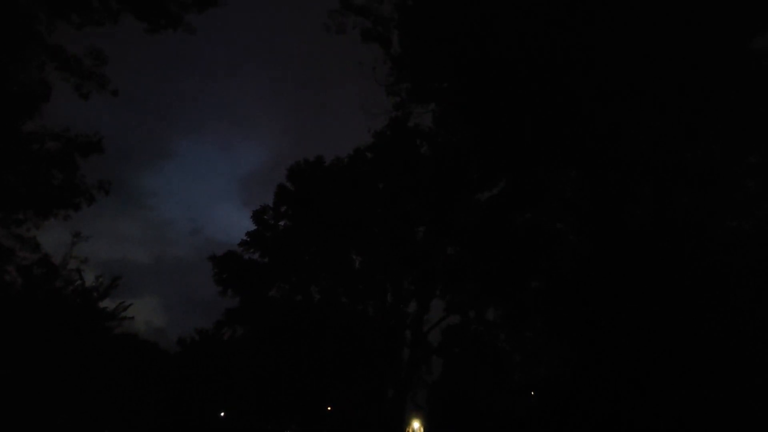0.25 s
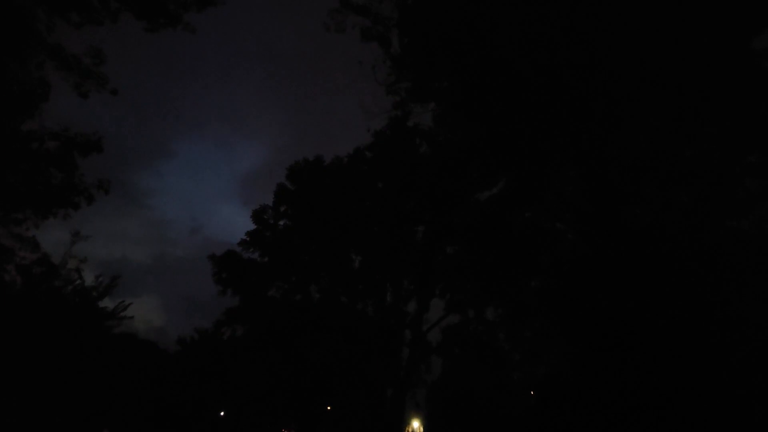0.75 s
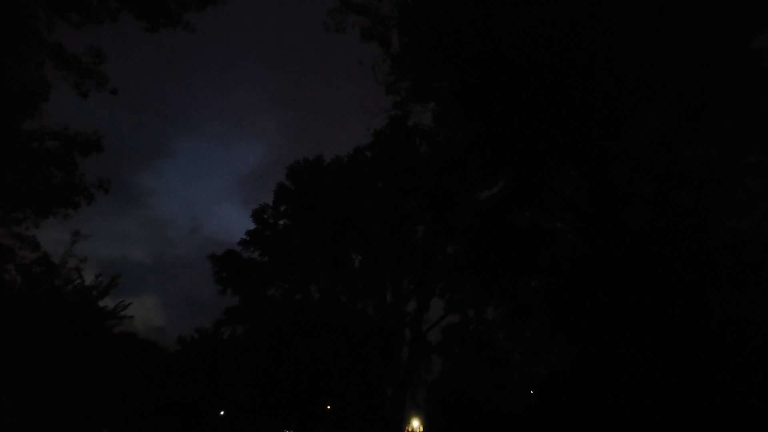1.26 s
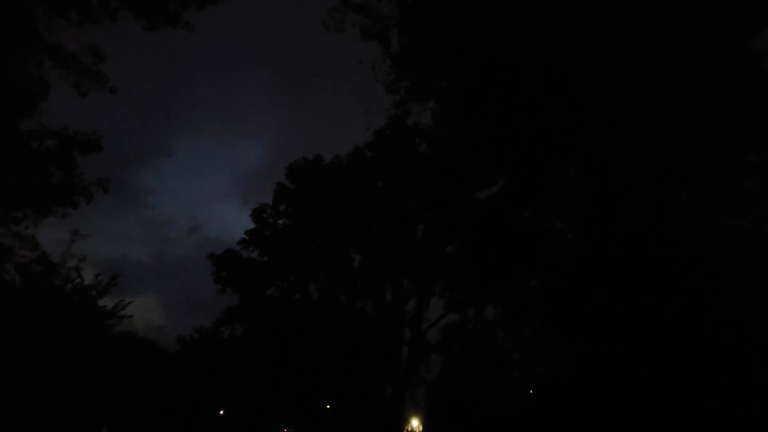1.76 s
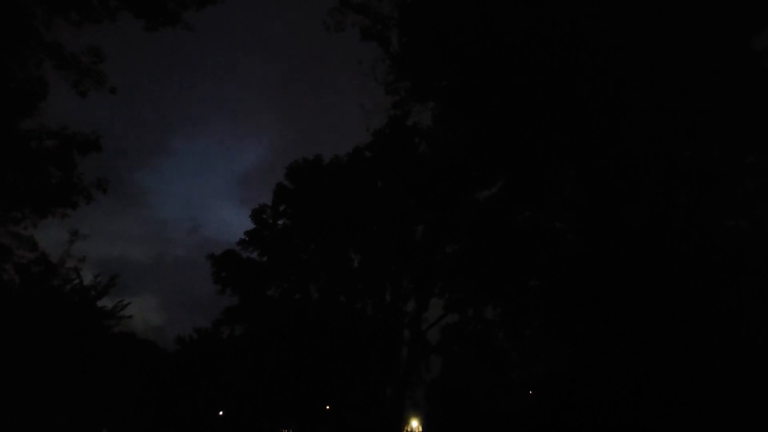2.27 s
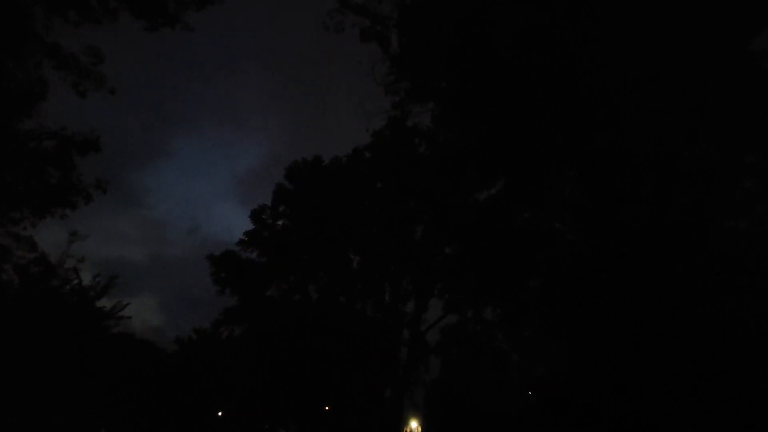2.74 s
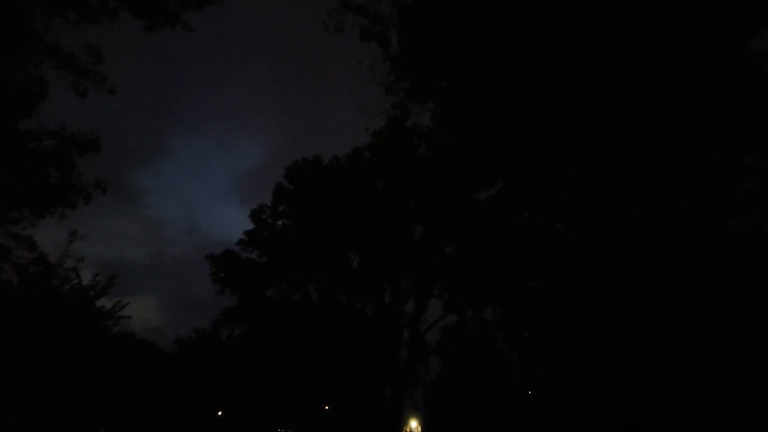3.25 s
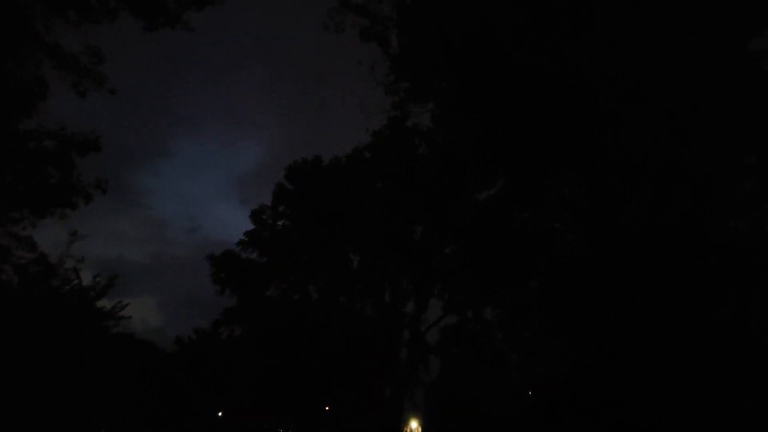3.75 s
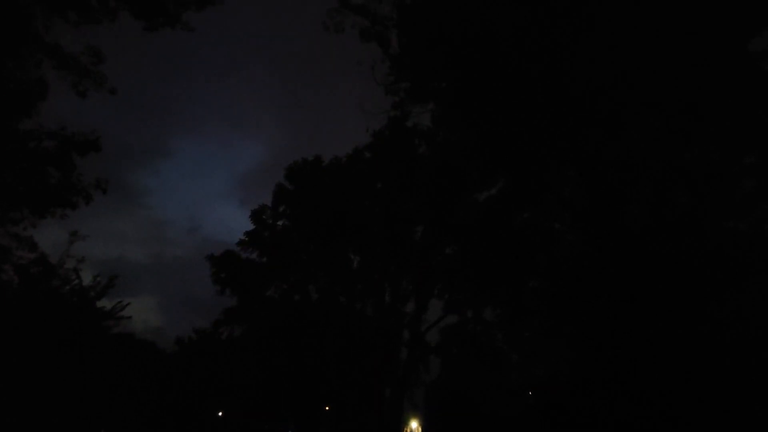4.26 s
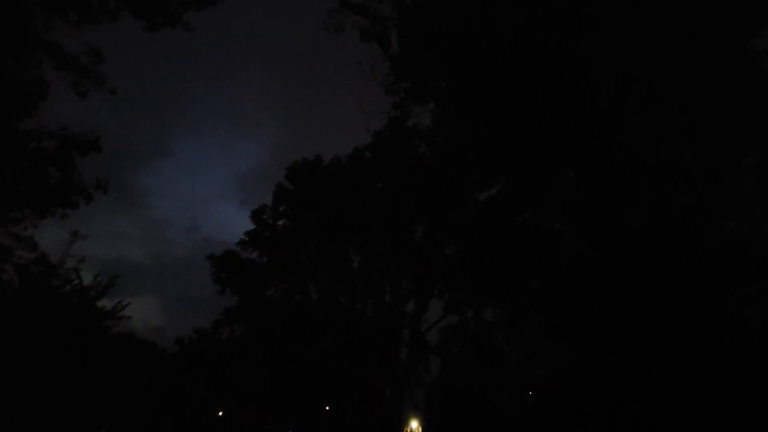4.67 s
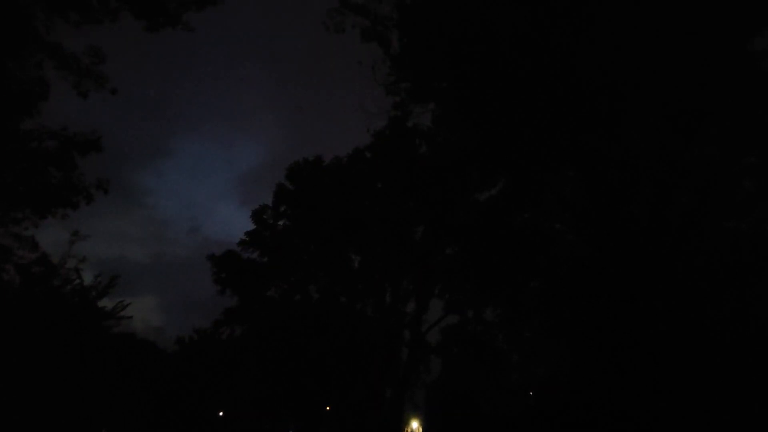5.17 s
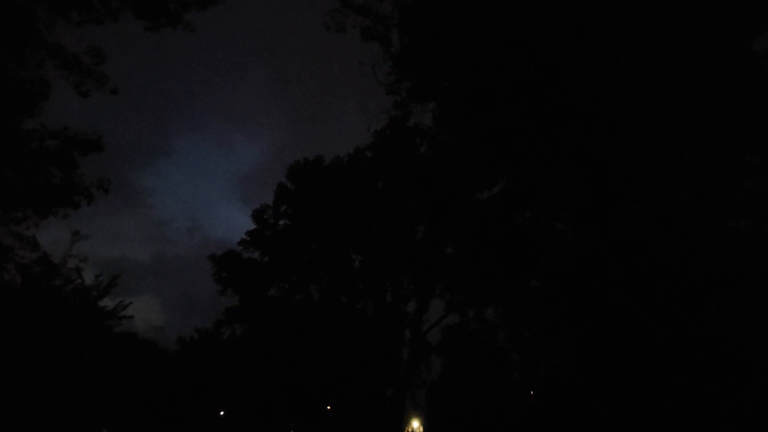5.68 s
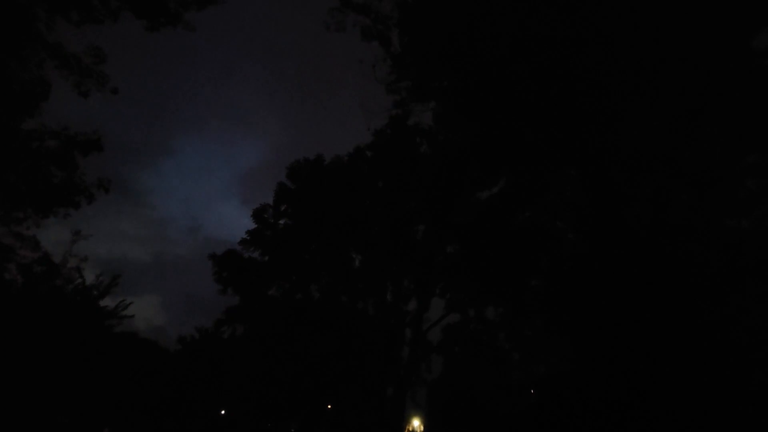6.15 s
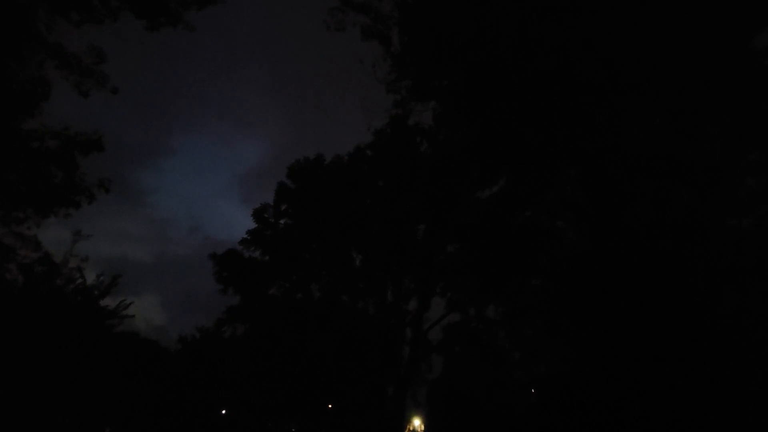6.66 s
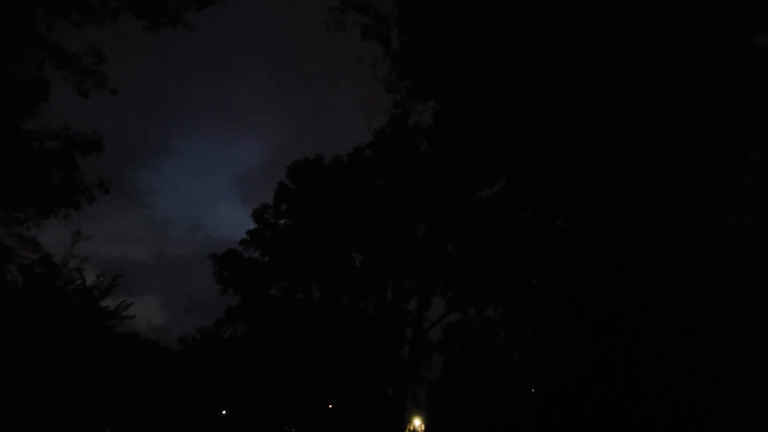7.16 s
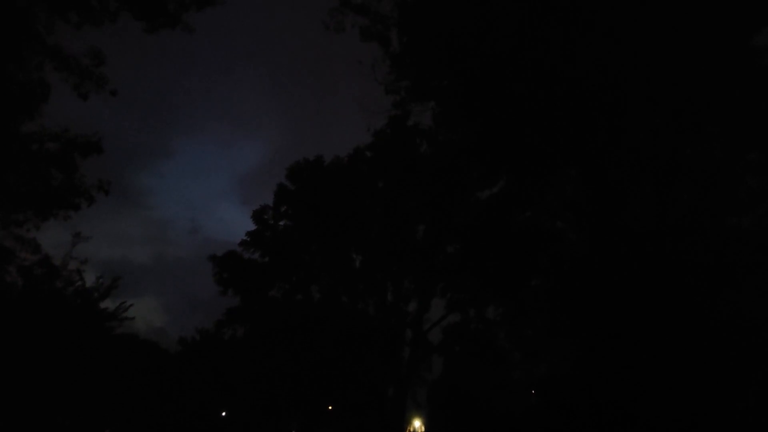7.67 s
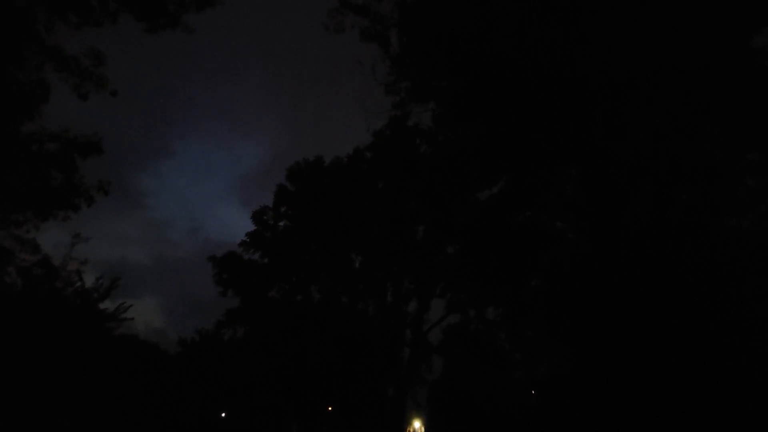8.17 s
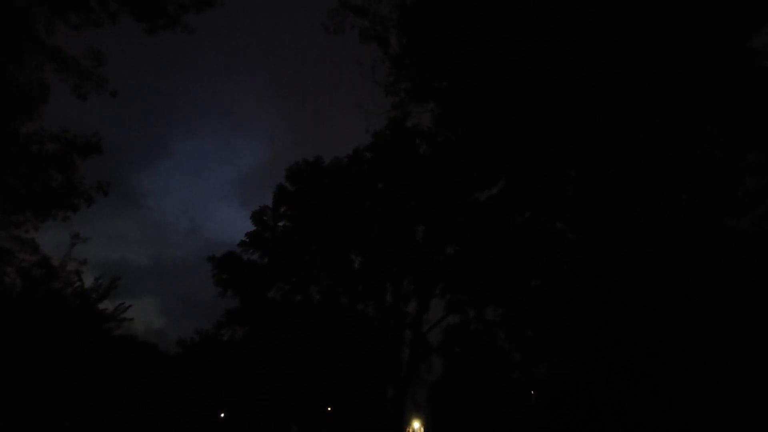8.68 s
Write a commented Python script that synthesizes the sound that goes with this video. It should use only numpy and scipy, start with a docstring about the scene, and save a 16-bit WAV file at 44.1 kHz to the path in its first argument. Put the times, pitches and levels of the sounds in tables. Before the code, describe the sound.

A warm night among trees, heard in wide stereo for about nine seconds. A close cricket trills fast near 3 kHz, breaking off briefly around 3.0, while a scattered tree chorus slowly grows behind it. Higher crickets sing up around 2.5-3, 3.3-5.7 and 6.5-7.6; others shimmer near 7 kHz. A very high fluttering hiss weakens after 1.7. Tiny lisps tick along five times a second, a second set joining at 6.5, with thin buzzes near 4.4 and 5.7. Katydids rasp coarsely, faint at 0.3, then mostly in pairs roughly every 0.65 seconds, sparser before 2.6. A distant engine hums around 100 Hz, rising slightly, then drops about 3.2 and fades unevenly into soft rumble. Distant thunder swells from 7.1 and is gone before 8; a small dry close tick falls at 7.8. Soft air gradually settles throughout.

```python
"""Summer night among trees

Crickets trill as runs of short falling tones; katydids rasp as noise chopped by the teeth of a wing.
Smaller insects lisp, buzz and hiss higher up, all made from narrow bands of noise.
Far off an engine, a few sine tones, drones, eases and fades into a low rumble of dull noise.
A soft wash of air lies around it all; late on, distant thunder swells once and a small dry tick rings."""
import sys
import numpy as np
from scipy import signal
from scipy.fft import rfft, irfft, next_fast_len
from scipy.io import wavfile

SR = 44100
rng = np.random.default_rng(int(sys.argv[2]) if len(sys.argv) > 2 else 0)


def waveform_to_disk(signal):
    """Save audio, clipped to [-1, 1], as 16-bit WAV at the path in sys.argv[1]."""
    frames = np.transpose(np.atleast_2d(signal))
    scaled = np.clip(frames, -1, 1) * 32767
    samples = np.round(scaled).astype(np.int16)
    wavfile.write(sys.argv[1], SR, samples)


N = 393372
TIME = np.arange(N) / SR
SIZE = next_fast_len(N, True)
HZ = np.fft.rfftfreq(SIZE, 1 / SR)


def gain_of(db):
    """Turns decibels into amplitude."""
    return 10 ** (np.asarray(db) / 20)


def evened(x):
    """Scales a sound to an rms (average strength) of 1."""
    return x / np.sqrt(np.mean(x ** 2) + 1e-20)


def read(points):
    """Reads a table over frequency, joining its points on a log axis."""
    hz, value = np.transpose(points)
    return np.interp(np.log(HZ + 1), np.log(hz + 1), value)


def follow(rows):
    """Makes a curve over time by joining points with straight lines."""
    return np.interp(TIME, *np.transpose(rows))


def bell(s, half_width_s):
    """Makes a soft swell of height 1 around a moment."""
    return np.exp(-.5 * ((TIME - s) / half_width_s) ** 2)


def drift(per_s):
    """Wanders at random with rms 1: a sum of slow sines, the fastest at per_s cycles per second."""
    t = np.linspace(0, N / SR, 900)
    rates = per_s * np.geomspace(1 / 20, 1, 20)[:, None]
    waves = np.sin(2 * np.pi * (rates * t + rng.random((20, 1))))
    return np.interp(TIME, t, evened((waves / rates ** (1 / 4)).sum(0)))


# How alike the noise is at the left and right ports.
# Each row: frequency in Hz, likeness from -1 (opposite) through 0 (unrelated) to 1 (the same).
PORT_LIKENESS = [(60, .98), (150, 1), (230, 0.99), (330, 0.53), (500, -0.25), (1170, -0.39), (1800, -0.31),
                 (2700, -0.024)]


def noise(colour_db):
    """Makes noise from all around: the two ports agree in the bass and differ higher up."""
    a, b = rng.standard_normal((2, len(HZ))) + 1j * rng.standard_normal((2, len(HZ)))
    same = np.clip(read(PORT_LIKENESS), -1, 1)
    ports = np.array([a, same * a + np.sqrt(1 - same ** 2) * b])
    return evened(irfft(ports * gain_of(colour_db), SIZE)[:, :N])


def wing(hz, width_hz):
    """Gives the gain in dB of a wing that rings at one pitch and falls off steeply on both sides."""
    return -20 * np.log10(1 + ((HZ - hz) / (width_hz / 2)) ** 2 / 2)


def trees(x, t60=0.5):
    """Scatters a sound off trunks and leaves, differently to each port; it dies 60 dB in t60 seconds."""
    t = TIME[:SR // 2]
    tail = rng.standard_normal((2, len(t))) * gain_of(-60 * t / t60)
    return evened(irfft(rfft(x, SIZE) * rfft(tail, SIZE), SIZE)[:, :N])


def from_right(x, count=15):
    """Places a sound to the right: the left port hears it a few samples late."""
    left, right = x * np.ones((2, 1))
    return np.array([np.pad(left, (count, 0))[:N], right])


def trill(rows, lean_db, haste=0.0038, flutter_db=0.5, duty=0.73):
    """Sings each wing stroke as a short tone falling in pitch; every cricket keeps its own tempo."""
    out = np.zeros((2, N))
    for hz, rate, fall_hz, db, scattered, wander_hz in rows:
        strokes = np.cumsum(rate * (1 + haste * drift(2))) / SR + rng.random()
        # the wing sounds for the share "duty" of each stroke, then rests
        closing = np.minimum(strokes % 1 / duty, 1)
        pitch = hz + wander_hz * drift(7) + fall_hz * (closing.mean() - closing)
        tone = np.sin(2 * np.pi * np.cumsum(pitch) / SR)
        song = evened(np.sin(np.pi * closing) * tone) * gain_of(flutter_db * drift(10))
        # a positive lean makes the left port louder
        direct = from_right(song, count=12) * gain_of([[lean_db], [-lean_db]])
        scattered = np.clip(scattered, 0, 1)
        out += gain_of(db) * (np.sqrt(1 - scattered) * direct + np.sqrt(scattered) * trees(song))
    return out


# Four groups of trilling crickets: one close by, then the tree, field and ground choruses.
# Each row: wing tone in Hz, wing strokes per second, fall of the tone in a stroke in Hz,
# level in dB before the group's own level, share scattered by the trees 0-1, wander of the tone in Hz.
CLOSE_CRICKET = [(3062, 69.5, 120, -50.3, .05, 4)]
TREE_CHORUS = [(2960, 70, 210, -55.5, 0.74, 24), (3097, 69, 173, -56.5, 0.95, 28),
               (3034, 73, 256, -55, 0.93, 36), (2992, 63, 350, -57.5, 0.95, 45),
               (3566, 52, 190, -71.5, 0.89, 10.04)]
FIELD_CHORUS = [(5030, 64, 490, -70.5, 0.66, 50), (4916, 30, 560, -70, .95, 80)]
GROUND_CHORUS = [(7010, 40.5, 230, -66, 0.85, 29), (6920, 30, 254, -66, 0.83, 45),
                 (7086, 80, 475, -66.5, 0.96, 70), (6660, 47, 450, -71, 0.9, 55)]
# How keenly the close cricket sings; it breaks off once. Each row: time in seconds, level in dB.
CLOSE_KEENNESS = [(0, -3.5), (2.9, -3), (3.05, -20), (3.4, -3), (5.6, -5), (6.1, -0.5), (6.7, -6.5),
                  (7.5, 0.5), (8.9, -4)]
# Bouts in which the field crickets sing up. Each row: start in seconds, end in seconds, level in dB.
SINGING_BOUTS = [(2.5, 3.0, 2), (3.3, 5.7, 2), (6.5, 7.6, 4)]


def crickets(rest_db=-1.5, bout_edge_s=0.16, throb_per_s=4.1, throb_db=1.13):
    """Trills one cricket close by and three looser choruses; two slowly grow, one sings in bouts."""
    near = trill(CLOSE_CRICKET, lean_db=2.8, duty=.66) * gain_of(follow(CLOSE_KEENNESS))
    tree_db = -2.5 + 0.5751 * TIME + 0.03 * drift(3)
    tree = trill(TREE_CHORUS, lean_db=0.0, haste=.02) * gain_of(tree_db)
    field_db = rest_db + 0.5 * drift(4)
    for start, end, db in SINGING_BOUTS:
        inside_s = np.minimum(TIME - start, end - TIME)
        field_db += (db - rest_db) * np.clip(inside_s / bout_edge_s + .5, 0, 1)
    field = trill(FIELD_CHORUS, lean_db=-2.0, haste=.035, duty=0.78) * gain_of(field_db)
    # the ground chorus, the highest, throbs in level
    throb = throb_db * np.sin(2 * np.pi * (throb_per_s * TIME + 0.14 * drift(1.55)))
    ground = trill(GROUND_CHORUS, lean_db=4.0, haste=.025) * gain_of(-2 + 0.32 * TIME + throb)
    return near + tree + field + ground


# Colour of the coneheads' high hiss. Each row: frequency in Hz, level in dB.
HISS_COLOUR = [(8500, -20), (10500, -17), (11500, 2.5), (12400, 8), (13400, 6), (14050, 10), (14600, 8.5),
               (15700, -2.5)]
# Strength of the hiss; one conehead stops early on.
# Each row: time in seconds, level in dB before the overall lift.
HISS_STRENGTH = [(0, -63.5), (1.69, -63), (1.84, -66), (2.7, -65.7), (3.2, -67.5), (5.5, -69), (7.7, -68),
                 (7.85, -65.5), (8.92, -70)]


def coneheads(lift_db=2.5, flutter_db=1.0, sway_db=1.0):
    """Hisses without a break at the top of hearing: high noise that flutters slightly."""
    level_db = lift_db + follow(HISS_STRENGTH) + flutter_db * drift(90) + sway_db * drift(3)
    return gain_of(level_db) * noise(read(HISS_COLOUR))


# The far engine pulls, then eases off. Each row: time in seconds, firing rate in Hz.
FIRING_RATE = [(0, 95), (.5, 97.3), (1.7, 102), (2.6, 103.5), (3.15, 103), (3.45, 82), (4.5, 80.5), (7, 66)]
# Strength of its firing tone. Each row: time in seconds, level in dB.
FIRING_STRENGTH = [(0, -37), (.5, -35.5), (1.08, -40), (1.25, -32.5), (1.5, -37), (1.95, -38.5),
                   (3.8, -51.5), (4.6, -47), (7.1, -54.5)]
# The firing tone drops out briefly on the long way.
# Each row: time in seconds, half-width in seconds, change in dB.
FIRING_DROPOUTS = [(.32, 0.042, -16), (.6, .028, -9), (.85, 0.032, -11.5), (2.15, 0.084, -14.5)]
# Tones above the firing tone, the last perhaps from another machine; all sink with time.
# Each row: multiple of the firing rate, level at first in dB, change in dB per second.
UPPER_TONES = [(1.5, -64.5, -0.5), (2, -57, -1.77), (2.5, -62.5, -1.23), (3.16, -61.5, -4)]
# An upper tone swells now and then.
# Each row: which upper tone counted from 0, time in seconds, half-width in seconds, swell in dB.
UPPER_SWELLS = [(1, 1.05, .13, 4.5), (2, 1.37, .3, 6), (1, 1.76, 0.13, 8), (1, 2.64, .11, 12.5),
                (1, 3.1, 0.1, 10)]


def engine(fading_db=1.6, lumpy_turns=0.18, lumpy_db=3.5):
    """Hums a firing tone and a few tones above it; off the throttle the engine runs unevenly."""
    coasting = follow([(3.0, 0.058), (3.4, 1)])
    turns = np.cumsum(follow(FIRING_RATE)) / SR + coasting * lumpy_turns * drift(11)
    dropouts = sum(db * bell(s, half_width_s) for s, half_width_s, db in FIRING_DROPOUTS)
    firing_db = follow(FIRING_STRENGTH) + dropouts + coasting * lumpy_db * drift(13)
    drone = gain_of(firing_db) * np.sin(2 * np.pi * turns)
    for k, (multiple, first_db, db_per_s) in enumerate(UPPER_TONES):
        tone_db = first_db + db_per_s * TIME + fading_db * drift(7.2)
        for which, s, half_width_s, db in UPPER_SWELLS:
            if round(which) == k:
                tone_db += db * bell(s, half_width_s)
        drone += gain_of(tone_db) * np.sin(2 * np.pi * (multiple * turns + rng.random()))
    return np.sqrt(2) * drone  # lifts a sine to rms 1


# Colour of the far rumble. Each row: frequency in Hz, level in dB.
RUMBLE_COLOUR = [(15, -35), (25, -18), (38, -11.5), (52, -1), (68, -2.5), (90, -4.5), (120, -8.5),
                 (160, -18), (235, -15.5), (280, -21), (340, -22.5), (420, -44.5), (600, -52.5)]
# How the rumble swells. Each row: time in seconds, level in dB.
RUMBLE_STRENGTH = [(0, -51), (1.8, -46.5), (4.6, -45.5), (6.9, -51), (7.8, -47), (8.92, -47.5)]


def rumble(roll_db=1.06):
    """Rumbles dully: low noise whose level rolls at random."""
    return gain_of(follow(RUMBLE_STRENGTH) + roll_db * drift(10)) * noise(read(RUMBLE_COLOUR))


# Colour of the night air and the blur of far insects. Each row: frequency in Hz, level in dB.
AIR_COLOUR = [(150, 3), (400, -4), (750, 0.5), (1000, -5), (1300, -4.5), (1800, -9.5), (2400, -11.5),
              (3050, 1.5), (3500, -8), (4200, -14), (4900, -13.5), (5600, -21), (6400, -13.5), (7350, -10),
              (7650, -33.5), (10000, -30.5), (11500, -32)]


def air(start_db=-49.5, settle_db_per_s=0.4833, stir_db=1.03):
    """Washes softly from all around: noise that slowly settles."""
    return gain_of(start_db - settle_db_per_s * TIME + stir_db * drift(8)) * noise(read(AIR_COLOUR))


# Two small katydids that lisp at a nearly steady rate; the higher one joins late and grows.
# Each row: first chirp in seconds, chirps per second, wing tone in Hz, width in Hz,
# level at the first chirp in dB, growth in dB per second.
LISPING_PAIR = [(.07, 5.0, 9260, 332, -74, 0), (6.45, 3.9, 9860, 480, -76, 2.5)]
# Short thin buzzes. Each row: middle in seconds, length in seconds, level in dB.
THIN_BUZZES = [(4.4, 0.6, -72.5), (5.66, 0.58, -72)]


def meadow_katydids(chirp_s=0.032, late_s=.008, uneven_db=1.6, buzz_hz=8030, buzz_width_hz=420):
    """Lisps very high, uneven in strength and timing, and buzzes twice: noise rung by small wings."""
    out = np.zeros((2, N))
    for first, rate, hz, width_hz, first_db, growth_db in LISPING_PAIR:
        chirp_number = np.maximum(np.round((TIME - first) * rate), 0)
        nearest = first + chirp_number / rate + late_s * drift(8)
        level_db = first_db + growth_db * (TIME - first) + uneven_db * drift(12)
        out += bell(nearest, chirp_s) * gain_of(level_db) * noise(wing(hz, width_hz))
    buzzes = np.zeros(N)
    for s, length, db in THIN_BUZZES:
        from_middle = 2 * (TIME - s) / length
        buzzes += gain_of(db) * np.exp(-2 * from_middle ** 4)  # flat top, steep ends
    return out + buzzes * noise(wing(buzz_hz, buzz_width_hz))


# Colour of the katydid's wing. Each row: frequency in Hz, level in dB.
RASP_COLOUR = [(1500, -19.5), (2300, -4.5), (2700, 0), (3200, 2.5), (3600, 3), (3850, 0), (4100, -6.5),
               (4500, -6), (5100, -7), (5700, -19), (7500, -45), (10000, -29)]
# Calls of one or two rasps. Each row: first rasp in seconds, number of rasps, level in dB.
RASPING_CALLS = [(.26, 1, -62), (.56, 2, -52), (1.16, 2, -53.5), (2.59, 2, -52), (3.37, 2, -52.5),
                 (4.055, 2, -51), (4.69, 1, -50.5), (5.03, 2, -52), (5.61, 1, -58), (5.93, 2, -51),
                 (6.58, 2, -52), (7.225, 2, -52), (7.84, 2, -52.5), (8.46, 2, -52)]


def katydids(gap_s=0.13, answer_s=0.12, answer_db=-10.5, teeth_per_s=240, grit=0.24, echo=0.19, echo_s=0.085):
    """Drags a scraper over coarse teeth, which ripples the noise; the trees draw each rasp out."""
    def rasp(s, db, rise_s=0.024, fall_s=0.032):
        """Gives the power over time of one stroke of the scraper."""
        return gain_of(db) ** 2 * bell(s, np.where(TIME < s, rise_s, fall_s))
    power = np.zeros(N)
    for start, count, db in RASPING_CALLS:
        times = start + gap_s * np.arange(round(count))
        power += sum(rasp(s, db) for s in times)
        # a farther katydid answers the last rasp
        power += rasp(times[-1] + answer_s, db + answer_db)
    keep = np.exp(-1 / (echo_s * SR))
    power += echo * signal.lfilter([1 - keep], [1, -keep], power)
    teeth = np.cumsum(teeth_per_s * (1 + .2 * drift(12))) / SR
    scrape = evened(noise(read(RASP_COLOUR)) * (1 + grit * np.cos(2 * np.pi * teeth)))
    return np.sqrt(abs(power)) * scrape


# Colour of a roll of thunder. Each row: frequency in Hz, level in dB.
THUNDER_COLOUR = [(15, -41), (35, -7), (60, -9), (82, 4.5), (108, -21), (130, -8.5), (160, -28),
                  (190, -15.5), (250, -33), (310, -31), (350, -24), (430, -34), (700, -73)]


def thunder(start_s=7.08, rise_s=0.14, hold_s=0.41, peak_db=-37, sag_db_per_s=11.5, decay_db_per_s=60):
    """Rolls once: low noise that rises, sags, then dies away faster."""
    age = np.maximum(TIME - start_s, 0)
    sag_db = sag_db_per_s * np.maximum(age - rise_s, 0)
    decay_db = decay_db_per_s * np.maximum(age - rise_s - hold_s, 0)
    rise = np.minimum(age / rise_s, 1)
    return rise * gain_of(peak_db - sag_db - decay_db) * noise(read(THUNDER_COLOUR))


# What the tick rings with.
# Each row: frequency in Hz, level in dB before the tick's own level, time to fall 60 dB in seconds.
TICK_RINGS = [(750, -4, 0.0065), (1310, -4, 0.0052), (2000, -4, 0.0039), (4400, -12, .003)]


def tick(s=7.7868, level_db=-40, scatter_db=-13):
    """Ticks once, small, dry and close: fast-dying tones with a brief scatter of noise."""
    age = np.maximum(TIME - s, 0)
    ring = sum(gain_of(db - 60 * age / t60) * np.sin(2 * np.pi * hz * age) for hz, db, t60 in TICK_RINGS)
    scatter = (age > 0) * gain_of(scatter_db - 60 * age / 0.05) * noise(wing(1400, 2500))
    return gain_of(level_db) * (scatter - ring)


def scene():
    """Adds up all the voices of the night."""
    insects = crickets() + coneheads() + meadow_katydids() + katydids()
    far_off = from_right(engine() + rumble() + thunder())
    return insects + far_off + air() + tick()


# The two microphone ports colour the sound differently.
# Each row: frequency in Hz, left minus right in dB.
PORT_DIFFERENCE = [(100, -1), (330, 0), (750, -3.5), (1800, 0), (2500, -1.5), (3050, -6), (3600, -4),
                   (4400, -3), (5000, 10), (5600, 9), (7500, 10.5), (9300, 10.5), (10400, 8.5),
                   (12300, -8.5), (14000, -8), (15500, 8)]
# Both ports share one notch. Each row: frequency in Hz, gain in dB.
SHARED_NOTCH = [(7900, 0.5), (8250, -13), (8520, -47), (8800, -3), (9100, -0.5)]


def record(dry, edge_hz=15750):
    """Colours the sound as the two ports do, then cuts everything above the band edge."""
    colour = gain_of(read(SHARED_NOTCH) + np.array([[.5], [-.5]]) * read(PORT_DIFFERENCE))
    coloured = irfft(rfft(dry, SIZE) * colour, SIZE)[:, :N]
    low_pass = signal.firwin(1023, edge_hz, window=("kaiser", 9), fs=SR)
    return signal.oaconvolve(coloured, low_pass[None], "same")


dry = scene()
out = record(dry)
waveform_to_disk(out)
```